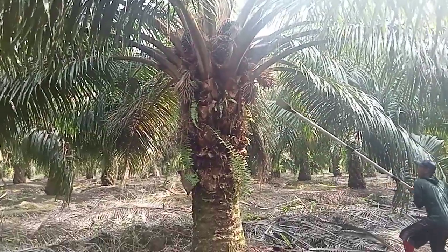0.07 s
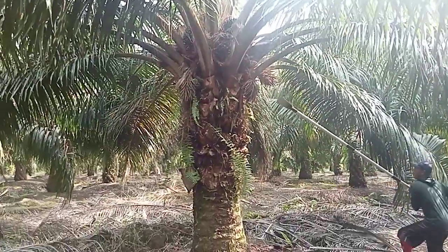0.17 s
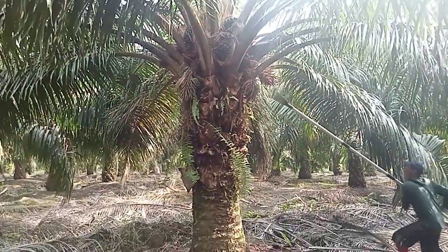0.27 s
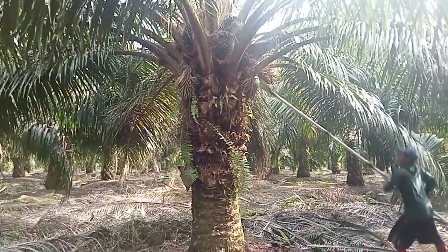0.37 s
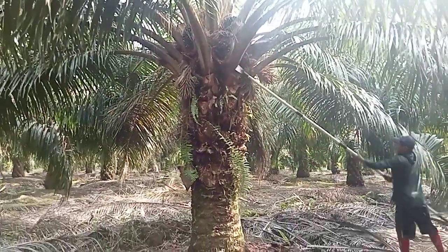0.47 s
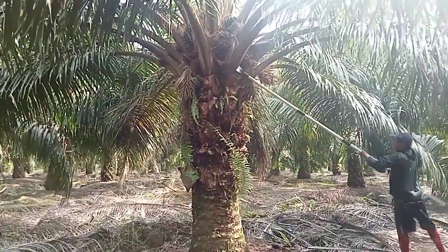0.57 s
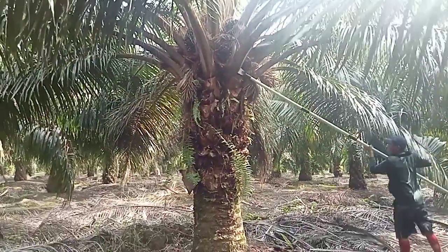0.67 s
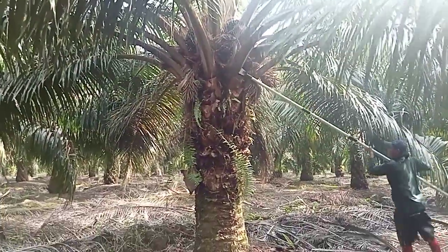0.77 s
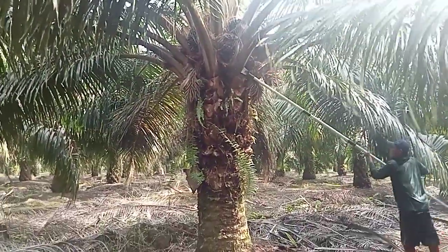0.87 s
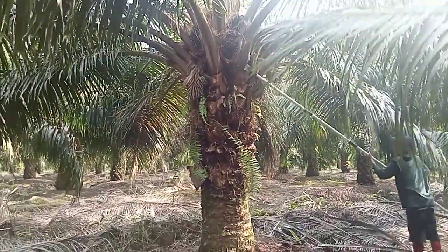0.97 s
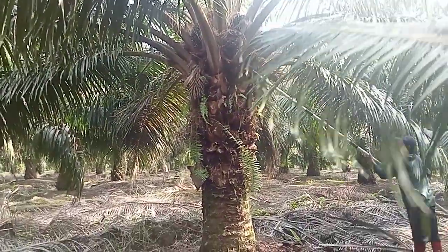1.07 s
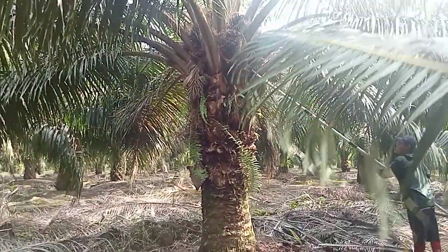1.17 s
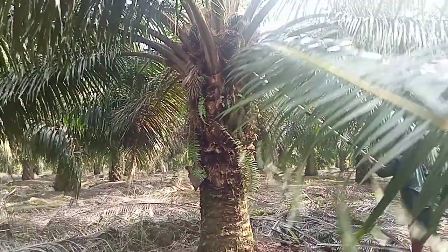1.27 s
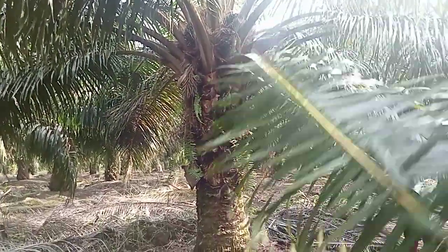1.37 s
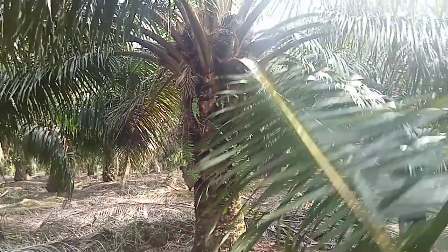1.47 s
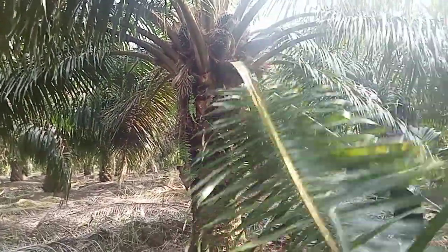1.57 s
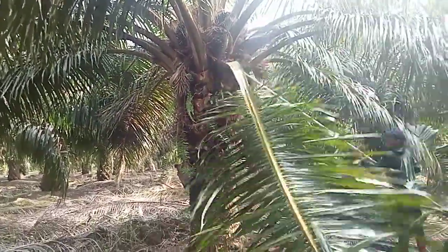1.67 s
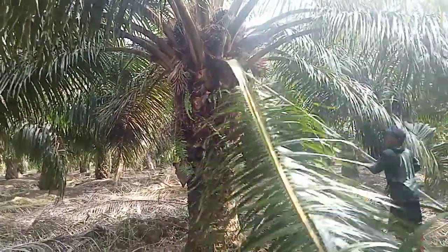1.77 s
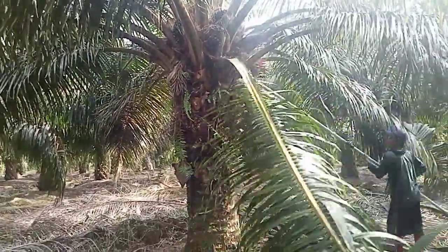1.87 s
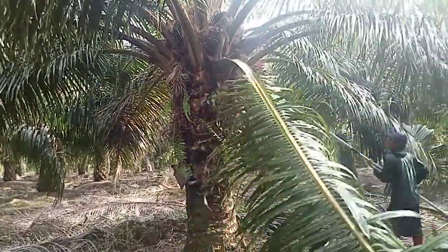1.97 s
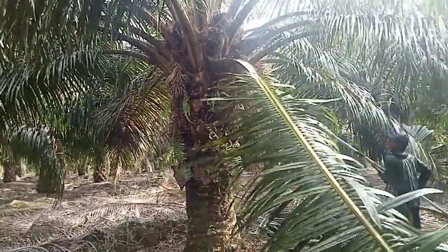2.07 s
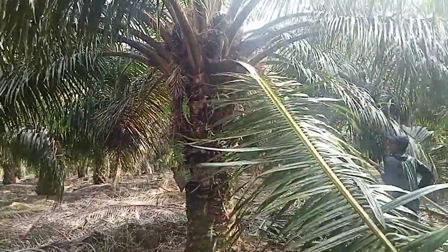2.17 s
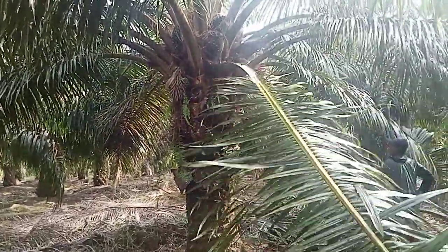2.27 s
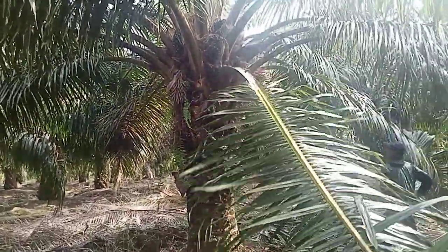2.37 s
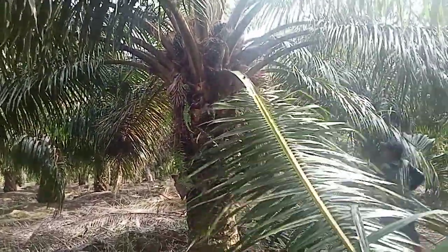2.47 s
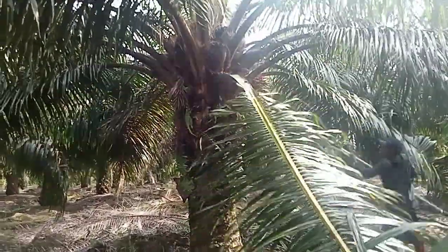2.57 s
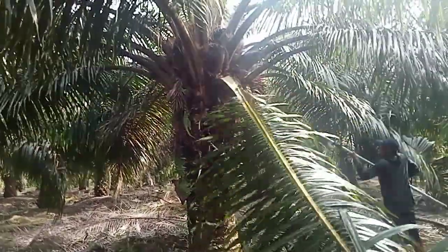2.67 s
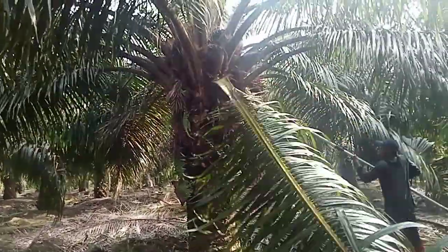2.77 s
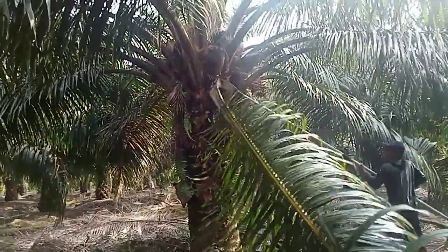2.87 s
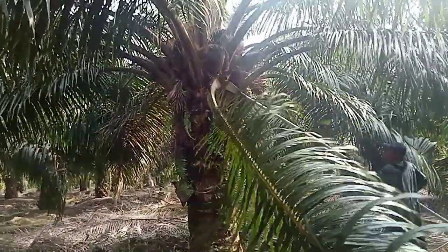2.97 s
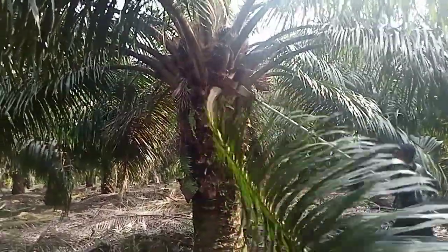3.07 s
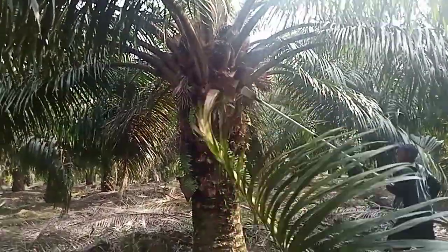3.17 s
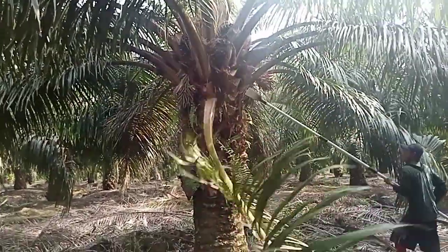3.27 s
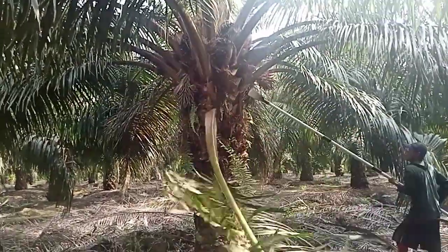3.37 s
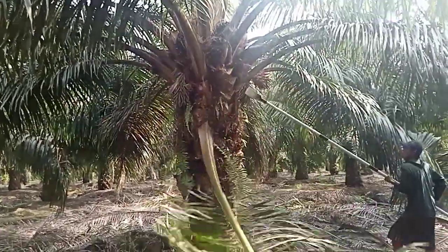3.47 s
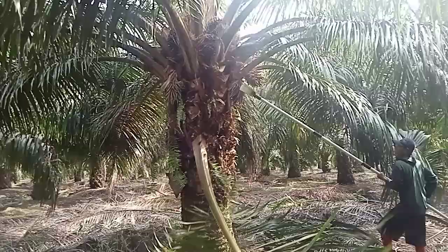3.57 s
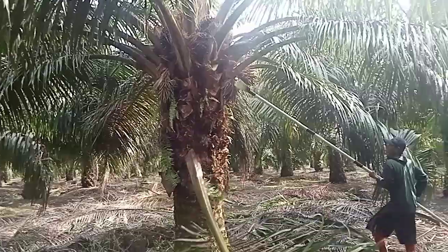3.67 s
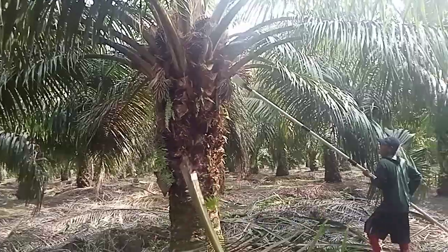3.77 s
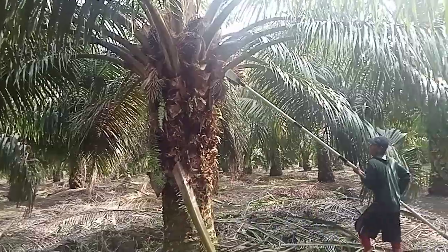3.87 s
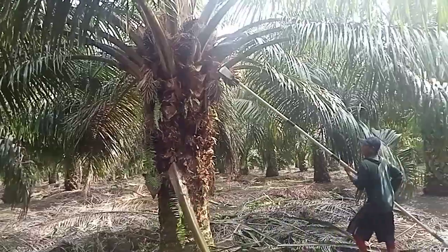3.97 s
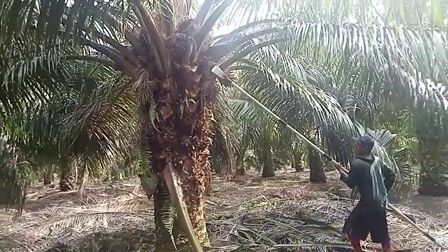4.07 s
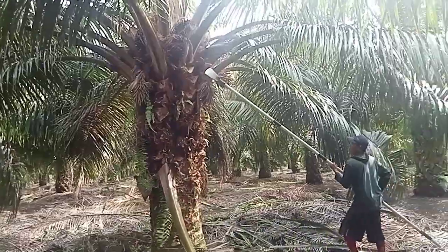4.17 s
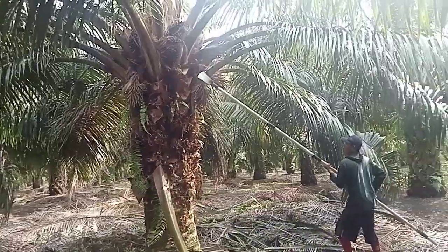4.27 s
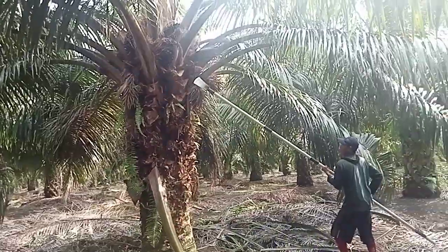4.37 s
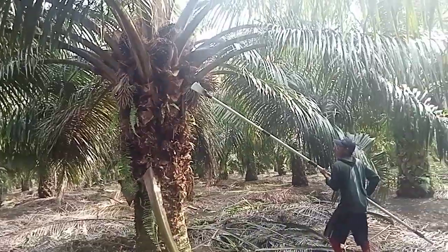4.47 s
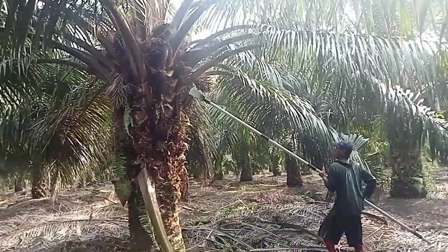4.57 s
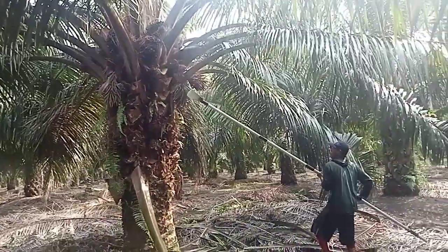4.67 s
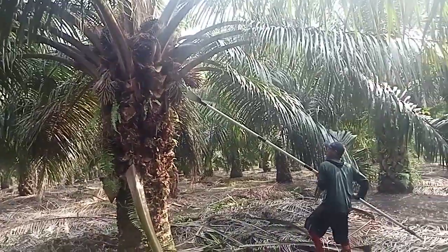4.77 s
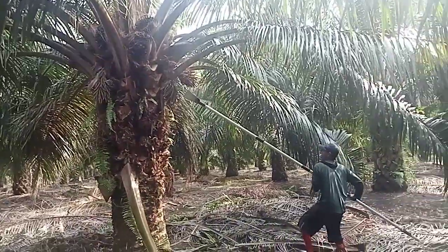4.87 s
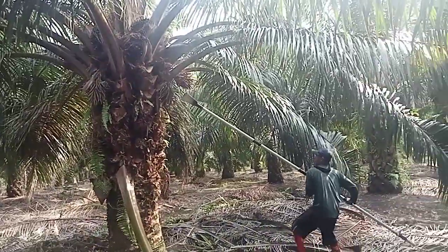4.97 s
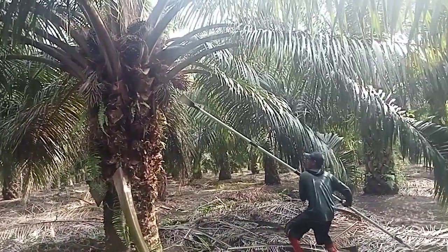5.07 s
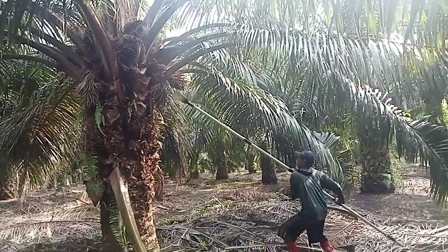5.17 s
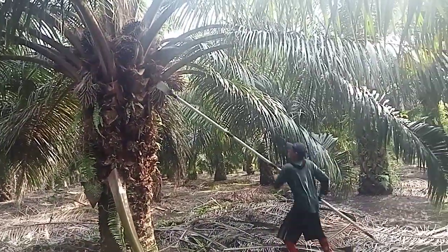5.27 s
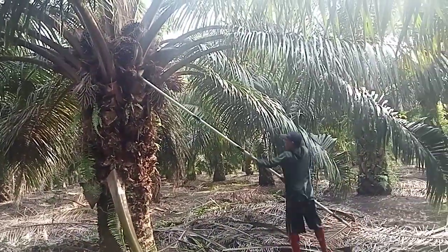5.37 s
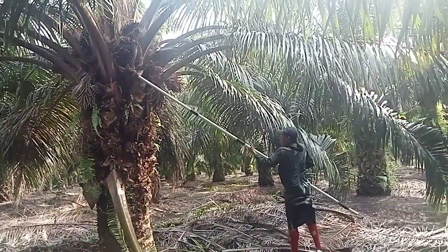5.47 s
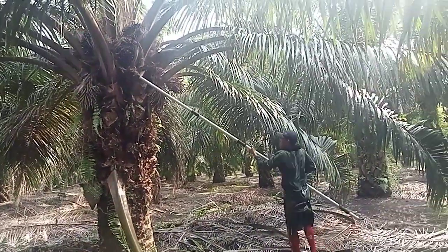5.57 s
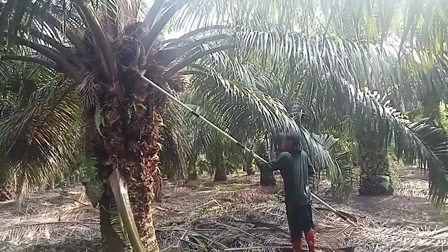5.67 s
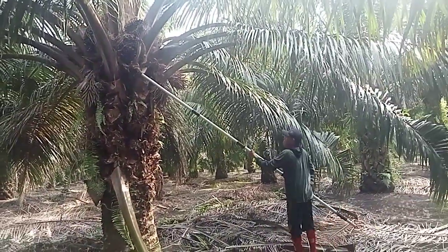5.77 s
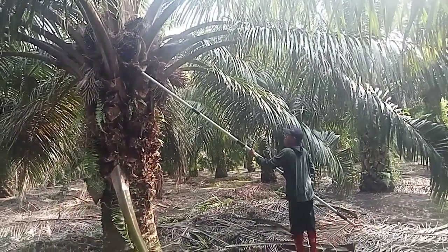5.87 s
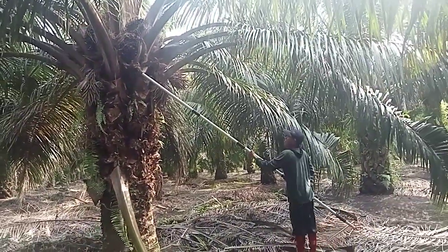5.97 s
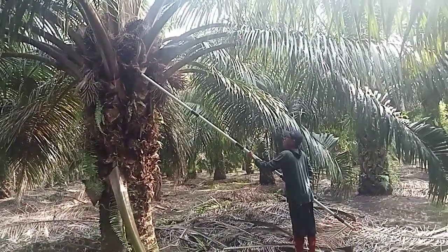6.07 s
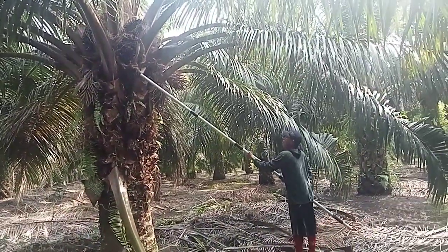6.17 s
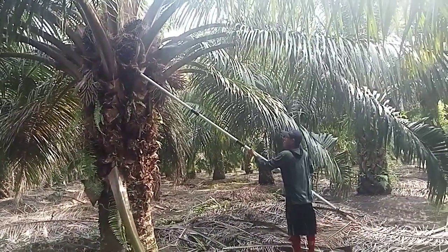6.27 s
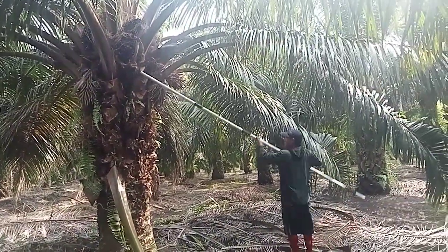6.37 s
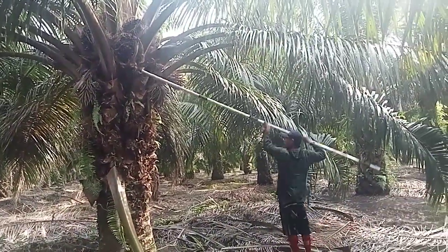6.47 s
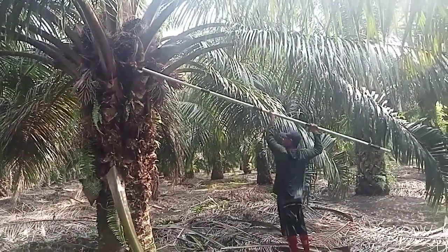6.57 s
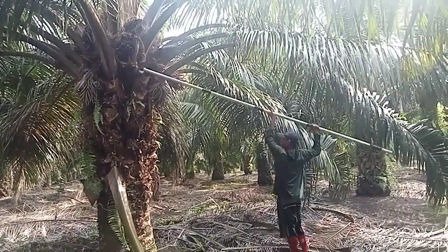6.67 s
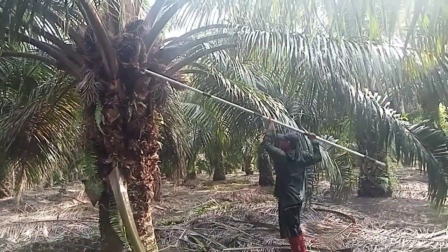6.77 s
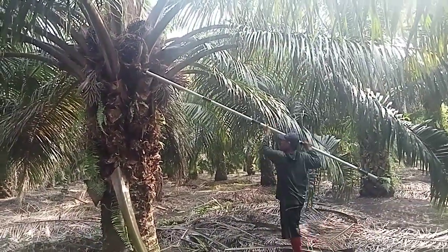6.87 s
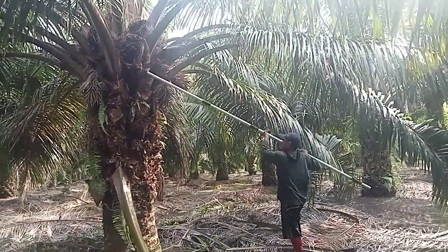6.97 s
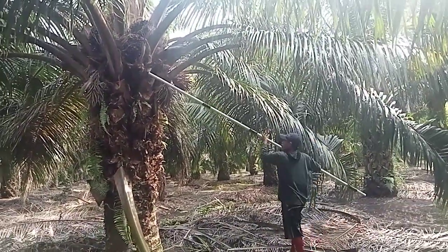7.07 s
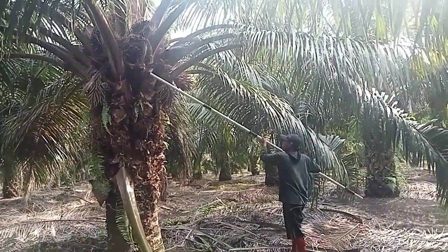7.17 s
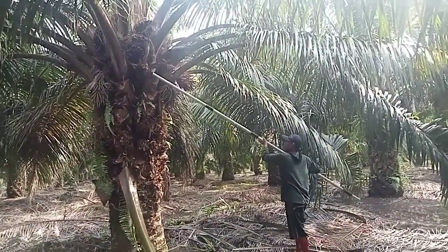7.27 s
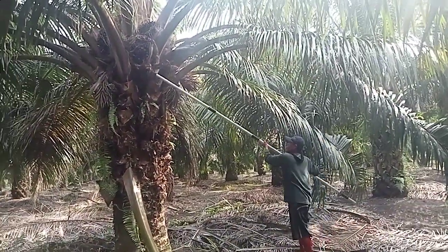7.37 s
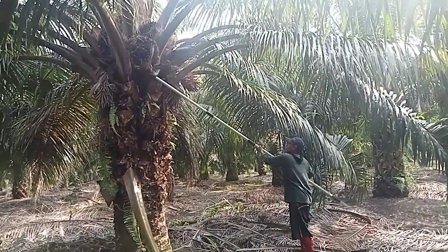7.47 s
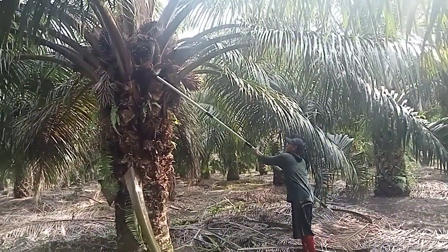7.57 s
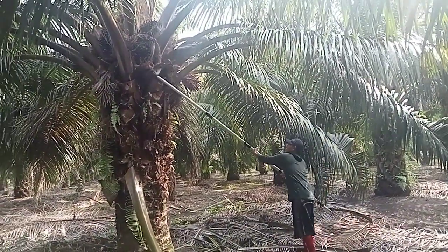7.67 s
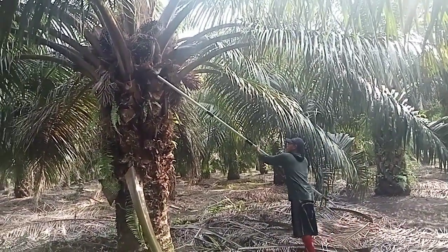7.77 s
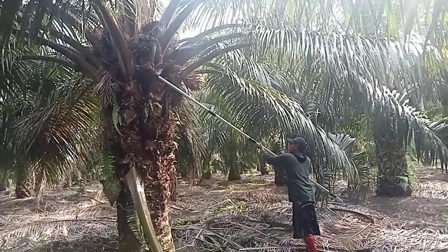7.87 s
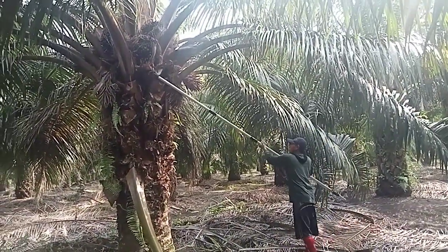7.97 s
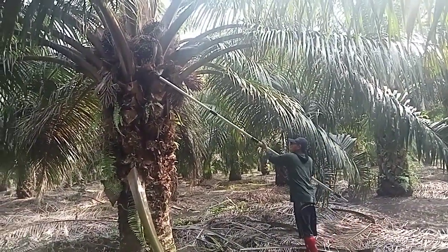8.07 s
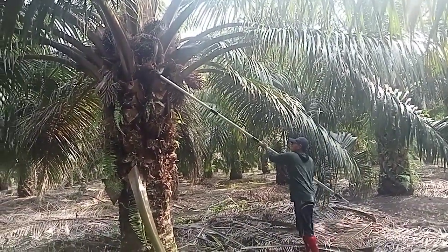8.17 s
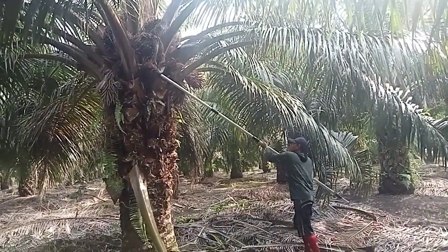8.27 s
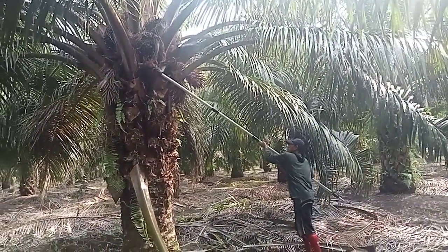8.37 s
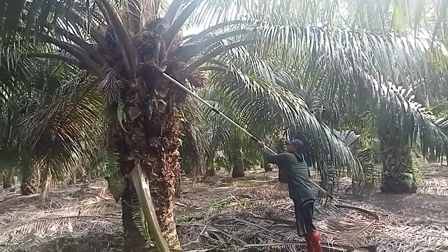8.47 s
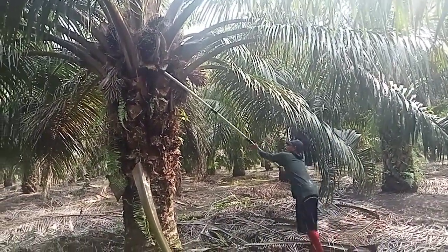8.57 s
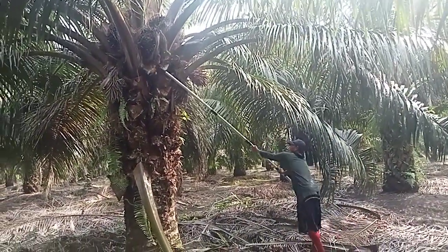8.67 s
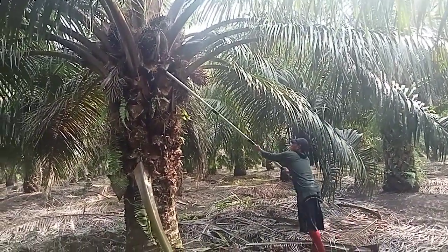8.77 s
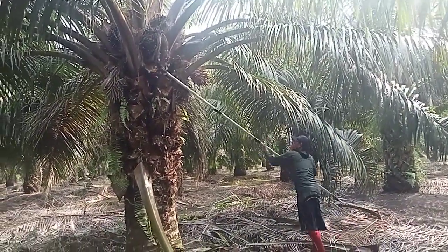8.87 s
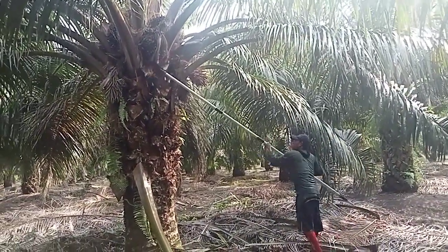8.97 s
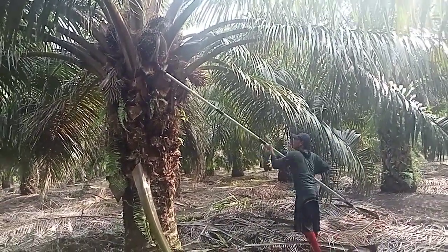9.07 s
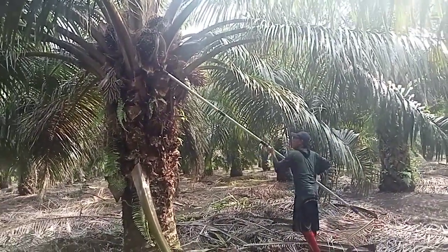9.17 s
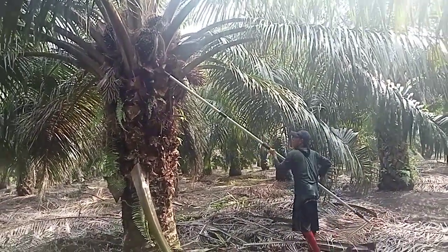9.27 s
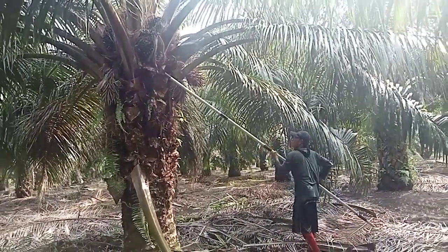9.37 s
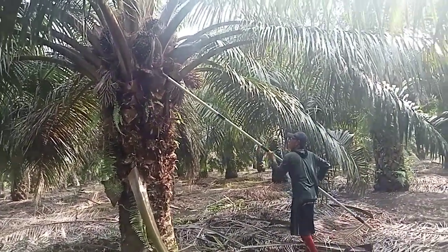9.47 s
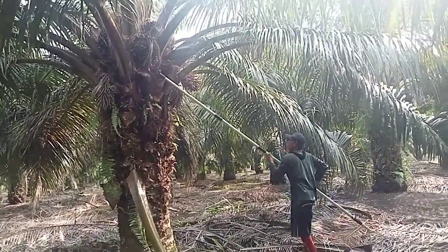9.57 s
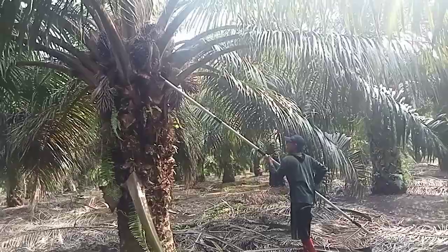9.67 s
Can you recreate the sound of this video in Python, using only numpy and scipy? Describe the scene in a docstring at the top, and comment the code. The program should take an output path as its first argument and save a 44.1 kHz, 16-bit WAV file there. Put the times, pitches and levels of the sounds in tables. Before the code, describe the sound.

Fibrous crack of a blade in thick palm stalk, then stiff leaflets snap and rush as the frond drops. After a lull, a woody chop and another rustling fall with many snaps, fading out. A hard chop midway leads to a brief ragged creak, soft knocks, a faint insect chirp and light tapping. Open grove, quiet air, single small microphone, nearly dry.

```python
"""Outdoors among trunks, a blade on a long pole chops palm fronds out of a tree crown.
Noise bursts make snapping fibres and strike resonators for the wood and the thick stalks, which knock and creak.
Clumped noise puffs make stiff leaflets rustle and crash as fronds fall; a gated sine is an insect far off.
Sparse echoes follow the breaks, and one microphone feeds two equal channels."""
import sys
import numpy as np
from scipy import signal
from scipy.fft import rfft, irfft
from scipy.io import wavfile

SR = 44100
rng = np.random.default_rng(int(sys.argv[2]) if len(sys.argv) > 2 else 0)


def dump_mix(stems):
    """Bounce the given channels to the path in sys.argv[1] as a 16-bit WAV at rate SR."""
    frames = np.atleast_2d(stems).T  # one column per channel
    limited = np.clip(frames, -1, 1)  # hard clip at full scale
    pcm = np.round(limited * 32767).astype(np.int16)
    wavfile.write(sys.argv[1], SR, pcm)


def level_to_linear(level):
    """Convert decibel levels to linear amplitude factors, elementwise."""
    exponent = np.asarray(level, float) / 20
    return 10 ** exponent


N = 428652

# Spectrum of leaflets and fibres. Each row: frequency in Hz, relative level in dB per Hz.
LEAF_SPECTRUM = [(530, -19.5), (900, -12.5), (1210, -3.5), (1380, -10), (2330, -2.5), (3110, -6.5),
                 (5310, -1), (6980, -12.5), (7860, -14), (9630, -7), (12800, -21.5), (15500, -15)]


def rms_one(x):
    """Power normalisation: scale to a mean square of one."""
    return x / np.sqrt(np.mean(x ** 2) + 1e-20)


def in_time(rows):
    """Linear interpolation: columns of a (seconds, value, ..) curve, sample by sample."""
    seconds, *columns = np.transpose(rows)
    return [np.interp(np.arange(N) / SR, seconds, column) for column in columns]


def high_pass(x, low_hz):
    """Second-order Butterworth high-pass: removes the bass."""
    return signal.sosfilt(signal.butter(2, low_hz, "high", fs=SR, output="sos"), x)


def band(x, low_hz, high_hz):
    """Butterworth band-pass: one band of a sound, at unit power."""
    sos = signal.butter(3, [low_hz, high_hz], "band", fs=SR, output="sos")
    return rms_one(signal.sosfilt(sos, x))


def colour(x, spectrum):
    """Minimum-phase filtering: a folded cepstrum shapes the spectrum so that nothing sounds early."""
    hz, level_db = np.transpose(spectrum)
    grid = np.linspace(1, SR / 2, 4097)
    log_gain = np.interp(np.log(grid), np.log(hz), level_db) * np.log(10) / 20
    cepstrum = irfft(log_gain)
    cepstrum[1:4096] *= 2
    cepstrum[4097:] = 0
    impulse = irfft(np.exp(rfft(cepstrum)))
    return signal.fftconvolve(x, impulse)[:len(x)]


def drift(rate_hz):
    """Low-pass random process: slow chance of spread 1, drawn every 40 samples."""
    pole = np.exp(-80 * np.pi * rate_hz / SR)
    noise = rng.standard_normal(N // 40 + 1002)
    slow = signal.lfilter([1], [1, -2 * pole, pole * pole], noise)[1000:]  # start-up left out
    return np.interp(np.arange(N) / 40, np.arange(len(slow)), rms_one(slow))


def ring(clicks, hz, t60):
    """Damped resonator: a unit click starts a sine of height 1 that falls 60 dB in t60 seconds."""
    radius, angle = level_to_linear(-60 / (t60 * SR)), 2 * np.pi * hz / SR
    poles = [1, -2 * radius * np.cos(angle), radius * radius]
    return signal.lfilter([0, np.sin(angle)], poles, clicks + 1e-18)


def crackle(per_s, spread_db, grain_s, smooth_db, clump_db):
    """Shot noise: clumped leaflet taps, each a fast-dying puff, over the blur of countless small ones."""
    sizes = level_to_linear(spread_db * np.minimum(rng.exponential(1, N), 5))  # capped, no freak taps
    taps = sizes * (rng.random(N) < per_s * level_to_linear(clump_db * drift(12)) / SR)
    puffs = signal.lfilter([1], [1, -np.exp(-1 / (grain_s * SR))], taps + 1e-18)
    sharp = rms_one(puffs * rng.standard_normal(N))
    return rms_one(sharp + level_to_linear(smooth_db) * rng.standard_normal(N))


def fractures():
    """Impulsive excitation: bursts of tearing fibres ring the wood modes and push on the stalks."""
    # The blade bites and tears into a stalk. Each row: start in seconds, fibre crack level in dB,
    # splitting wood level in dB, wood pitch in Hz, level of the force on the stalk in dB.
    blows = [(0.5579, -6.5, -29, 2420, -35.5), (0.581, -13, -9, 3300, -82), (0.671, -27, -34, 1800, -44),
             (2.616, -12.5, -13, 1643, -74), (2.649, -16, -21.5, 1990, -50), (2.662, -20, -23, 2100, -56),
             (2.697, -28, -40, 1480, -46), (5.086, -67, -32.5, 2000, -64), (5.477, -2.5, -10, 1500, -37),
             (5.501, -8.5, -16, 1660, -67), (5.565, -43, -23, 2010, -62), (6.5826, -26.5, -28, 2180, -56),
             (6.6228, -30, -26, 2340, -48.5), (7.5117, -32, -30, 1410, -47), (7.568, -26, -29.5, 1490, -53),
             (7.608, -29, -31.5, 1760, -62), (8.754, -31.5, -26.5, 2180, -47.5),
             (9.613, -21, -26, 1510, -68), (9.631, -28, -46, 2000, -55.5), (9.705, -40, -49, 2000, -82)]
    # Pole or blade taps wood, short and hard. Each row: start in seconds, fibre crack level in dB,
    # splitting wood level in dB, wood pitch in Hz, level of the force on the stalk in dB.
    taps = [(0.561, -15.5, -11, 700, -50), (1.267, -15, -28.5, 950, -57), (1.311, -16, -25, 950, -54.5),
            (3.171, -17.5, -26, 1700, -85), (4.6492, -27.5, -55, 1200, -64), (5.584, -25.5, -45, 2000, -52),
            (5.7883, -31.5, -31.5, 1540, -80), (5.886, -38, -40.5, 1620, -75),
            (6.343, -49, -35.5, 1290, -82), (6.351, -39.5, -41, 1400, -82), (6.394, -34, -40, 2260, -86),
            (6.422, -54, -26.5, 1500, -66), (6.882, -45, -56, 1180, -76), (6.911, -36.5, -44, 1400, -80),
            (7.13, -49.5, -45.5, 1280, -77), (8.797, -50, -48, 2190, -55), (8.879, -35.5, -44, 2320, -65.5),
            (8.951, -48, -39.5, 1980, -58), (9.293, -35.5, -38.5, 1190, -69),
            (9.424, -39, -30.5, 1500, -88), (9.462, -35, -39, 2300, -57), (9.502, -46, -53, 1200, -78),
            (9.524, -38, -41, 1800, -63.5), (9.549, -37, -39, 2200, -60), (9.563, -32, -40, 1800, -59)]
    # Leaflets and fibres snap. Each row: start in seconds, crack level in dB.
    snaps = [(0.5094, -28), (0.633, -17), (0.664, -13), (0.673, -16), (0.688, -12), (0.699, -11),
             (0.775, -16.5), (0.787, -19), (1.165, -40), (1.508, -12), (1.546, -8), (1.697, -8),
             (2.456, -26.5), (2.535, -18.5), (3.022, -23.5), (3.126, -20), (3.228, -17.5), (3.266, -19),
             (3.295, -17), (3.36, -15.5), (3.399, -10.5), (3.413, -13), (3.428, -14), (3.432, -11),
             (3.531, -14), (3.617, -10), (3.657, -10), (3.678, -9), (3.812, -10), (3.831, -16),
             (3.847, -16), (3.901, -32), (4.051, -17.5), (4.145, -20), (4.215, -18.5), (4.245, -29),
             (4.262, -28), (4.34, -30), (4.366, -47), (4.418, -42), (7.533, -25.5), (7.5564, -22.5),
             (7.648, -35), (7.719, -27), (8.642, -51), (8.6597, -30), (8.904, -32.5), (8.972, -39)]
    # Modes of split wood. Each row: frequency in Hz, level in dB, 60 dB decay time in seconds.
    wood = [(700, 0, .018), (950, 0, .022), (1220, 0, .028), (1490, 0, .03), (1750, -1, .028),
            (1950, 0, .028), (2370, 0, .028), (3080, 0, .025), (3520, 0, .03)]
    blow_s, blow_rise_s = 0.013, 0.0046
    tap_s, tap_rise_s = 0.0037, 0.0002
    snap_s, snap_rise_s = 0.003, 0.00044
    snap_wood_db, snap_force_db = -19, -59.5  # relative to the crack
    fall_db_per_octave, chance_db = 15.5, 3  # modes far from a burst's pitch ring less
    splinter_db = -13.5  # unpitched part of the splitting wood

    tearing = crackle(900, spread_db=3.5, grain_s=0.00048, smooth_db=5.5, clump_db=0.0)
    fibres = band(colour(tearing, LEAF_SPECTRUM), 2500, 20000)
    splinters = band(tearing, 600, 2300)
    rows = [(*row, blow_s, blow_rise_s) for row in blows]
    rows += [(*row, tap_s, tap_rise_s) for row in taps]
    rows += [(s, db, db + snap_wood_db, 2400, db + snap_force_db, snap_s, snap_rise_s) for s, db in snaps]
    chance = rng.standard_normal((len(rows), len(wood)))
    out, force = np.zeros(N), np.zeros(N)
    for (s, fibre_db, wood_db, pitch_hz, force_db, length, rise), luck in zip(rows, chance):
        at = round(s * SR)
        t = (np.arange(int(.08 * SR)) / SR)[:N - at]
        span = slice(at, at + len(t))
        shape = (1 - np.exp(-t / rise)) ** 2 * np.exp(-(t / length) ** 1.1)
        # each burst gets exactly the energy of its envelope
        strength = np.sqrt(np.mean(shape ** 2))
        crack, split, push = (rms_one(shape * x[span]) * strength for x in (fibres, splinters, tearing))
        out[span] += level_to_linear(fibre_db) * crack + level_to_linear(wood_db + splinter_db) * split
        force[span] += level_to_linear(force_db) * push
        for (hz, level_db, t60), u in zip(wood, luck):
            octaves_off = abs(np.log2(hz / pitch_hz))
            share_db = level_db - fall_db_per_octave * octaves_off + chance_db * u
            even = np.sqrt(10 / (t60 * SR))  # long ringing gains no extra power
            out[span] += level_to_linear(wood_db + share_db) * even * ring(push, hz, t60)
    return out + stalk(force)


def stalk(force):
    """Modal synthesis: thick stalks; the struck place keeps changing, and so does each mode's share."""
    # Modes of the stalks. Each row: frequency in Hz, mean level in dB, 60 dB decay time in seconds.
    stalk_modes = [(239, -5.5, 0.092), (280, -7.5, 0.033), (407, -4.5, 0.02), (492, 2.5, 0.0057),
                   (567, -4.5, 0.048), (700, 0, 0.019), (1000, -19.5, 0.02), (1520, -14.5, 0.02),
                   (2130, -21, .015)]
    modes = sum(ring(force * level_to_linear(level_db + 1.1 * drift(8.2)), hz, t60)
                for hz, level_db, t60 in stalk_modes)
    return high_pass(modes, 192)  # keeps the knocks free of bass below their lowest mode


def creak():
    """Stick-slip friction: the blade slips unevenly in a stalk, and grit rubs between the slips."""
    # Blade forced through a stalk. Each row: time in seconds, level in dB.
    creak_curve = [(6.409, -57), (6.422, -41.5), (6.5, -34), (6.56, -34), (6.63, -36.5), (6.68, -40.5),
                   (6.74, -52), (6.85, -62)]
    slips_per_s, sag_per_s2 = 128, 110  # slips slow down as the blade goes deeper
    uneven_start, uneven_growth_per_s = 0.09, 1.6  # and grow ragged
    level_db, = in_time(creak_curve)
    t = np.arange(N) / SR
    start, end = creak_curve[0][0], creak_curve[-1][0]
    since = np.clip(t - start, 0, end - start)
    per_s = slips_per_s - sag_per_s2 * since
    uneven = np.clip(uneven_start + uneven_growth_per_s * since, 0, .6)
    turns = np.cumsum(per_s * (1 + 0.27 * uneven * drift(36))) / SR
    slips = np.diff(np.floor(turns), prepend=0) * level_to_linear(3.7 * uneven * rng.standard_normal(N))
    grit = 0.08 * uneven * rng.standard_normal(N)
    on = (t > start) * (t < end)
    return level_to_linear(level_db) * rms_one(stalk(slips + grit)) * on


def thumps():
    """Single-mode resonance: a soft contact starts one low mode that dies within a few cycles."""
    # Low knocks, and at the start the fading low tone of a creak.
    # Each row: start in seconds, level in dB, pitch in Hz.
    thump_rows = [(0.003, -47, 270), (0.028, -44, 272), (0.118, -51, 280), (0.561, -22, 235),
                  (0.672, -32, 270), (0.694, -31, 280), (2.672, -24, 257), (2.701, -28, 332),
                  (5.481, -20, 250), (5.492, -21, 220), (5.601, -28, 300), (6.904, -41, 450),
                  (7.062, -46, 450), (7.125, -47, 400), (7.679, -40.5, 457), (8.799, -47, 500),
                  (7.8, -50, 400), (7.86, -53, 330), (9.455, -38, 170), (9.48, -50, 200), (9.502, -47, 190),
                  (9.524, -38, 222), (9.544, -37, 222), (9.564, -36, 198), (9.585, -48, 170)]
    cycles = 15  # until 60 dB down
    out = np.zeros(N)
    click = np.pad(np.hanning(80) / 40, (0, int(.1 * SR)))  # a soft contact
    for s, level_db, hz in thump_rows:
        at = round(s * SR)
        out[at:at + len(click)] += level_to_linear(level_db) * ring(click, hz, cycles / hz)[:N - at]
    return out


def brushing():
    """Amplitude envelope: Gaussian swells as the pole brushes through leaflets."""
    # Each row: centre in seconds, half length (to 1/e) in seconds, level in dB.
    swishes = [(5.119, 0.04, -38), (6.577, 0.11, -43), (8.714, 0.06, -46.5)]
    t = np.arange(N) / SR
    return sum(level_to_linear(level_db) * np.exp(-((t - s) / half) ** 2) for s, half, level_db in swishes)


def shoving():
    """Amplitude envelope: dull grinds with a linear attack and an exponential release."""
    # Blade shoved between stalk bases. Each row: start in seconds, length in seconds, level in dB.
    shoves = [(0, 0.092, -72), (6.433, 0.22, -41.5), (7.5, 0.34, -64.5), (8.673, 0.32, -57.5)]
    attack_s, release_s = 0.0022, 0.032
    t = np.arange(N) / SR
    out = np.zeros(N)
    for s, length, level_db in shoves:
        attack = np.clip((t - s) / attack_s, 0, 1)
        release = np.exp(-np.maximum(t - s - length, 0) / release_s)
        out += level_to_linear(level_db) * attack * release
    return out


def stalk_rumble(rustle_db):
    """Filtered shot noise: stalks rumble with a share of the rustle's swing, and grind at each shove."""
    # Spectrum of the rumble. Each row: frequency in Hz, relative level in dB per Hz.
    rumble_spectrum = [(24, -64), (40, -12), (236, -7), (476, -4.5), (1000, -5), (1690, -23), (2860, -120)]
    follows, under_db = 0.93, -16.5  # share of the rustle's dB, offset from it
    level = level_to_linear(follows * rustle_db + under_db) + shoving()
    grains = crackle(130, spread_db=-1.0, grain_s=0.0089, smooth_db=3.5, clump_db=4.5)
    return level * level_to_linear(0.8 * drift(5.5)) * rms_one(colour(grains, rumble_spectrum))


def leaves():
    """Band-wise shot noise: four sizes of leaflet part, each with taps and patches of its own."""
    # How hard the leaflets move. Each row: time in seconds, rustle level in dB ahead of the band offsets.
    leaf_motion = [(0.0, -55), (0.35, -63.5), (0.49, -55), (0.57, -35), (0.7, -29), (0.8, -29), (1.05, -35),
                   (1.3, -35.5), (1.46, -18), (1.59, -22.5), (1.76, -26), (1.82, -32), (2.33, -42),
                   (2.59, -43), (2.72, -31), (2.92, -40.5), (3.08, -34.5), (3.4, -26), (3.6, -21.5),
                   (3.72, -25.5), (3.76, -29), (3.9, -33.5), (4.28, -43), (5.2, -45.5), (6.1, -56),
                   (6.85, -62.5), (7.39, -66), (7.69, -52), (8.01, -64), (8.62, -63), (8.82, -54.5),
                   (9.26, -53.5), (9.72, -46)]
    # Level of the treble relative to the rustle. Each row: time in seconds, level in dB.
    treble = [(0, 2.5), (1.3, 1.5), (1.6, -5), (4.3, -2), (4.75, 4), (5.4, 1), (6.5, -5), (7.4, 0.5),
              (9.72, 3.5)]
    (rustle_db,), (treble_db,) = in_time(leaf_motion), in_time(treble)
    rustle_db = 20 * np.log10(level_to_linear(rustle_db) + brushing())
    shared = crackle(300, spread_db=0.5, grain_s=0.002, smooth_db=3.5, clump_db=6.0)
    bands = [(700, 2710, rustle_db - 16.5), (1307, 3225, rustle_db - 4.5),
             (2800, 7500, rustle_db + 0.5), (7640, 20500, rustle_db + treble_db)]
    out = np.zeros(N)
    for low_hz, high_hz, level_db in bands:
        own = crackle(160, spread_db=2.5, grain_s=0.0019, smooth_db=2.5, clump_db=5.0)
        rustle = band(colour(shared + 1.18 * own, LEAF_SPECTRUM), low_hz, high_hz)
        out += level_to_linear(level_db + 2.2 * drift(2.2)) * rustle
    return out + stalk_rumble(rustle_db)


def grove(x):
    """Convolution with a sparse impulse response: a few smeared echoes off ground and trunks."""
    # Each row: delay in seconds, level in dB.
    echoes = [(.005, -9.5), (.035, -13.5), (.07, -16)]
    tail = np.zeros(int(.25 * SR))
    smear = np.exp(-np.arange(len(tail)) / (0.012 * SR))
    for s, level_db in echoes:
        at = round(s * SR)
        puff = smear * rng.standard_normal(len(tail))
        tail[at:] += level_to_linear(level_db) * (puff / np.linalg.norm(puff))[:len(tail) - at]
    return high_pass(signal.fftconvolve(x, tail)[:N], 900)  # the echoes are bright, without low knocks


def insect():
    """Amplitude modulation: a pure tone gated into short chirps."""
    # Each row: start in seconds, length in seconds, level in dB.
    chirps = [(7.882, .03, -76), (7.915, 0.046, -64), (7.963, 0.062, -61.5), (8.073, .07, -62)]
    t = np.arange(N) / SR
    shape = sum(level_to_linear(level_db) * np.sin(np.pi * np.clip((t - s) / length, 0, 1)) ** .5
                for s, length, level_db in chirps)
    return shape * np.sin(2 * np.pi * 3370 * t)  # pitch in Hz


def air():
    """Coloured stationary noise: the open air, its level slowly wandering."""
    # Each row: frequency in Hz, relative level in dB per Hz.
    air_spectrum = [(18, -44.5), (30, 6), (139, 11.5), (871, -0.5), (2500, -1), (3250, -12.5), (5500, -120)]
    level_db = -69.5 + 1.5 * drift(3.8)
    return level_to_linear(level_db) * rms_one(colour(rng.standard_normal(N), air_spectrum))


def scene():
    """Superposition: all sources add at one microphone, given to two equal channels."""
    breaks = fractures() + creak() + thumps()
    background = air()
    return np.tile(breaks + grove(breaks) + leaves() + insect() + background, (2, 1))


def top_cut(x):
    """Nothing passes above the cut-off."""
    return signal.sosfilt(signal.butter(12, 16650, fs=SR, output="sos"), x)


def record(dry):
    """Band limiting and saturation: a small microphone lacks bass, rounds loud peaks and cuts the top."""
    thin = high_pass(dry, 136)
    # faint low noise of the microphone itself
    thin = thin + level_to_linear(-77.5) * band(rng.standard_normal(N), 54, 122)
    rounded = .95 * np.tanh(thin / .95)
    mix = signal.sosfilt(signal.cheby2(14, 60, 15800, fs=SR, output="sos"), rounded)
    return top_cut(mix)


dry = scene()
out = record(dry)
dump_mix(out)
```